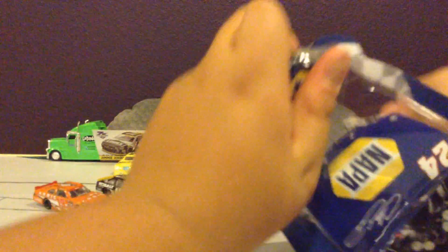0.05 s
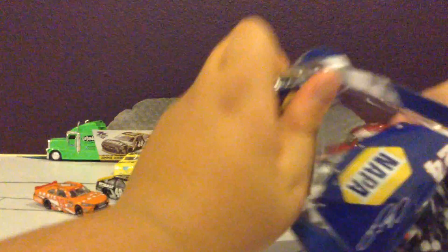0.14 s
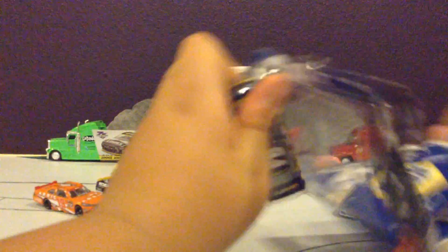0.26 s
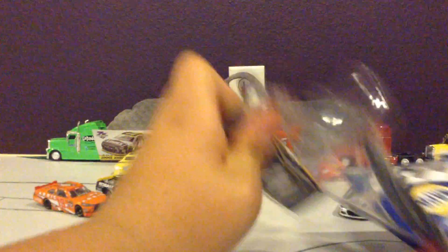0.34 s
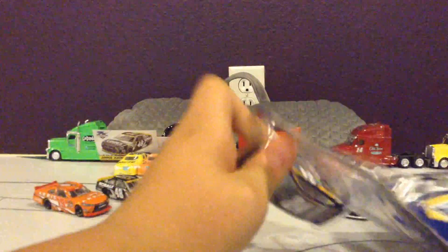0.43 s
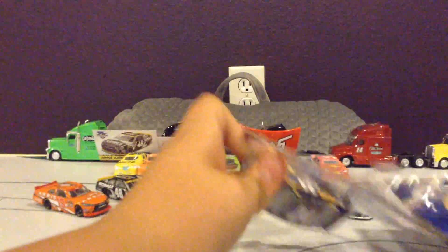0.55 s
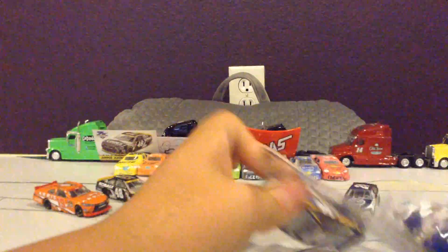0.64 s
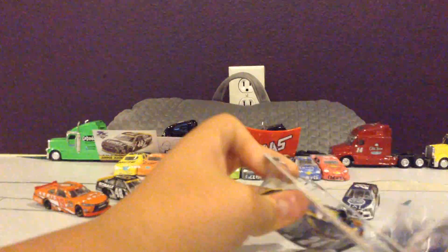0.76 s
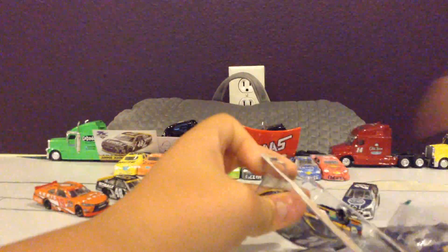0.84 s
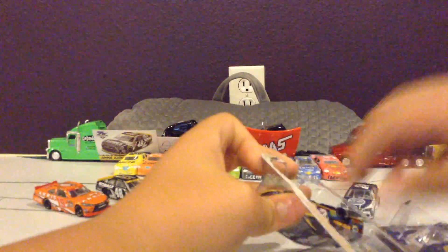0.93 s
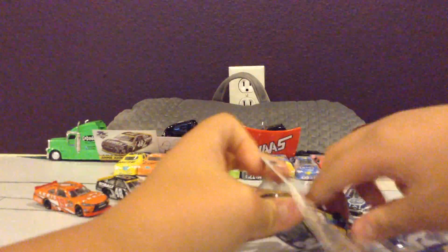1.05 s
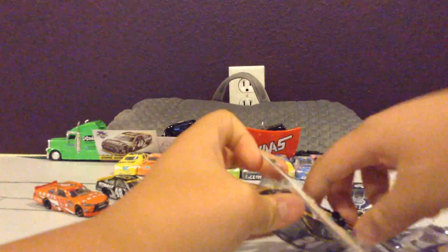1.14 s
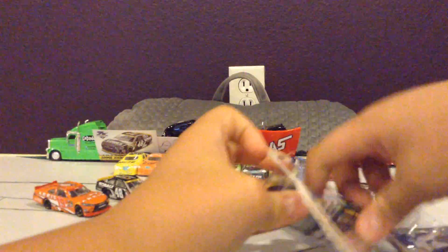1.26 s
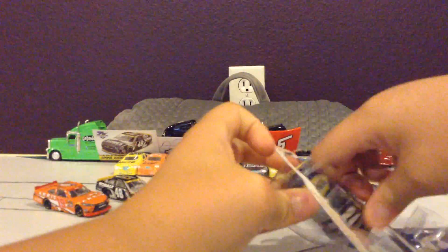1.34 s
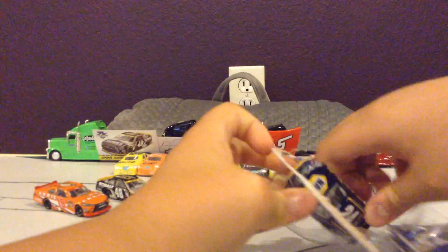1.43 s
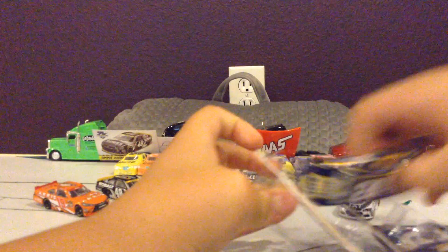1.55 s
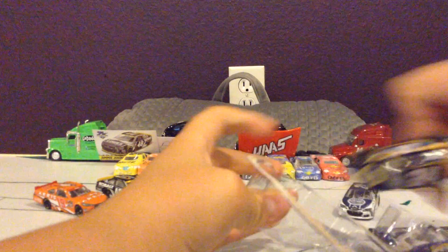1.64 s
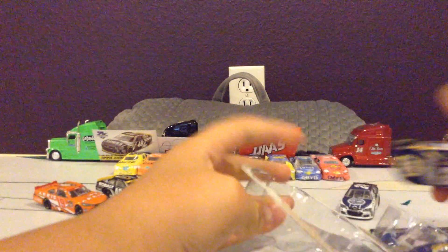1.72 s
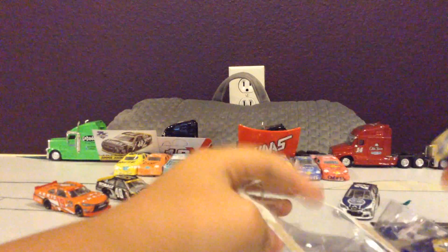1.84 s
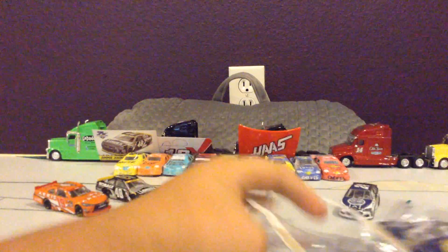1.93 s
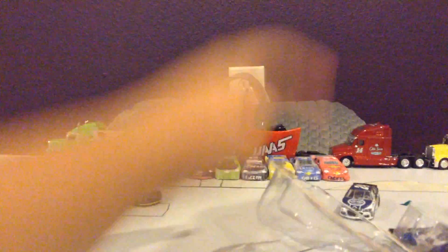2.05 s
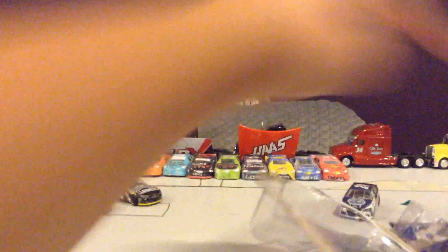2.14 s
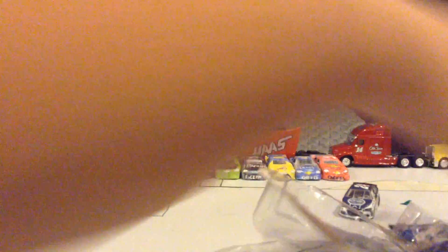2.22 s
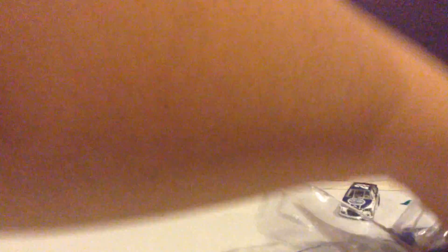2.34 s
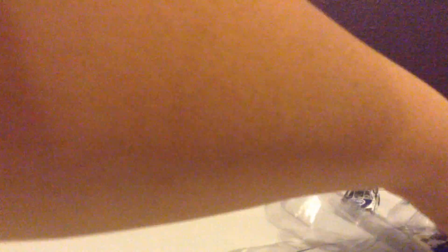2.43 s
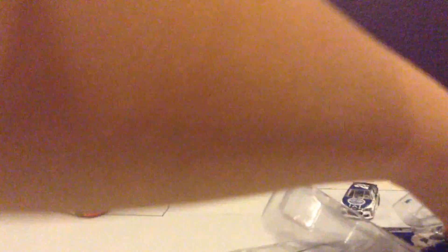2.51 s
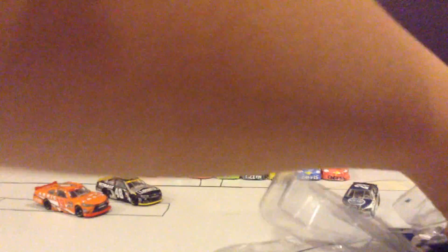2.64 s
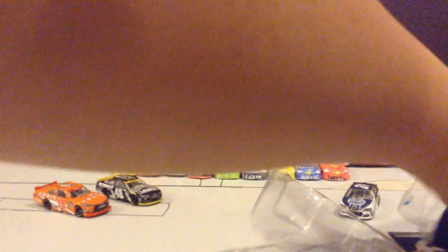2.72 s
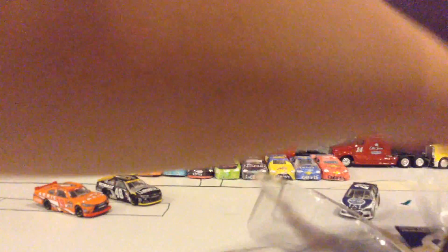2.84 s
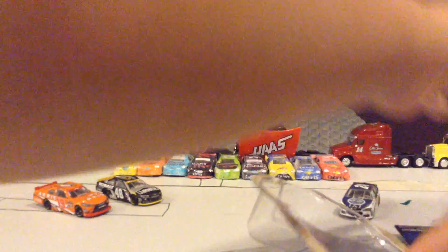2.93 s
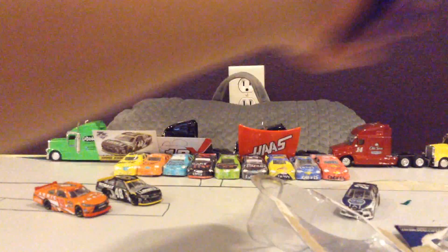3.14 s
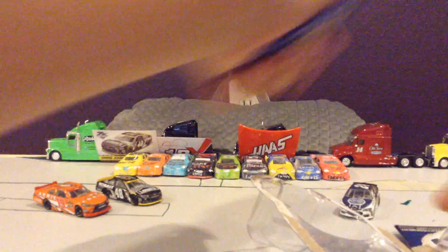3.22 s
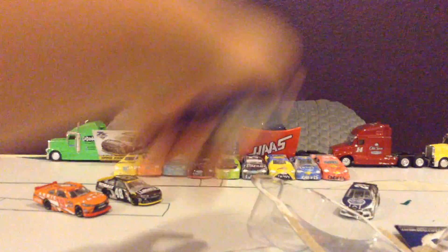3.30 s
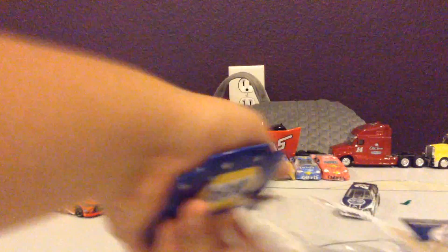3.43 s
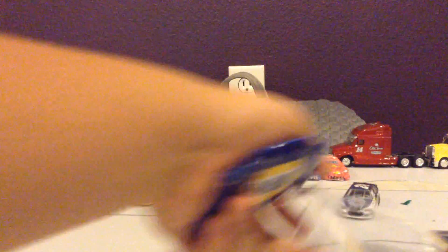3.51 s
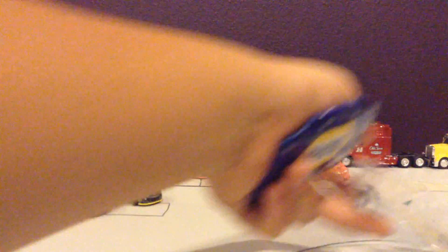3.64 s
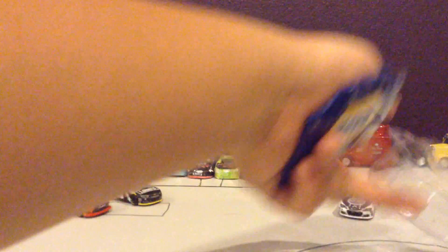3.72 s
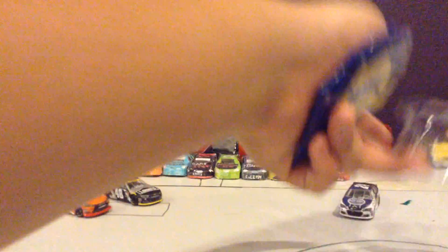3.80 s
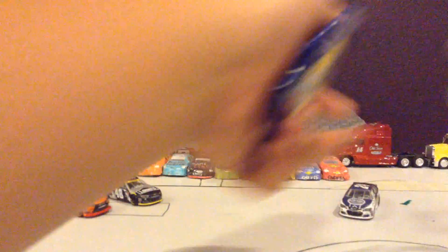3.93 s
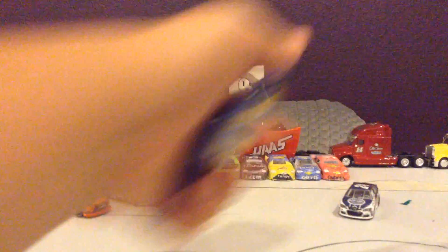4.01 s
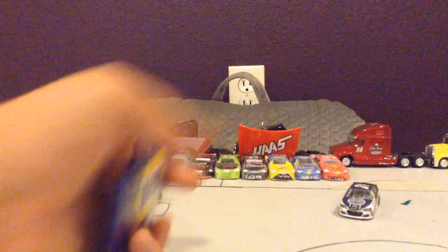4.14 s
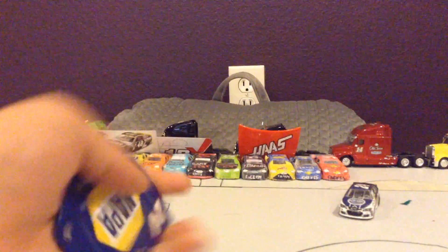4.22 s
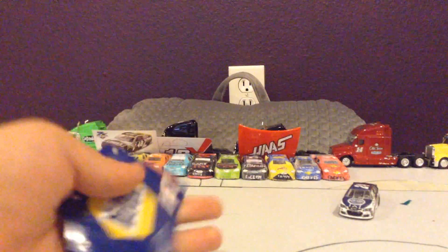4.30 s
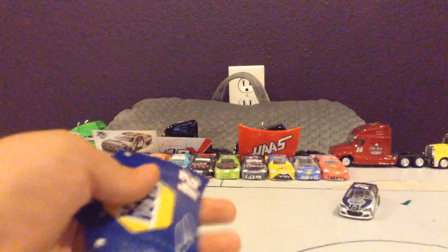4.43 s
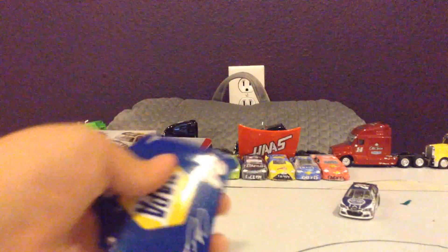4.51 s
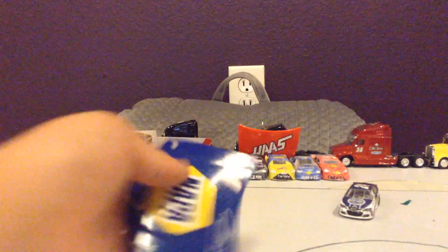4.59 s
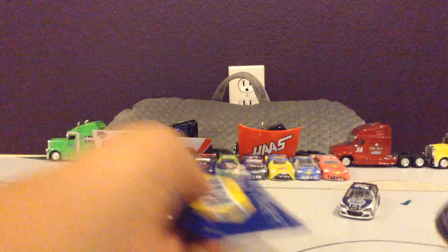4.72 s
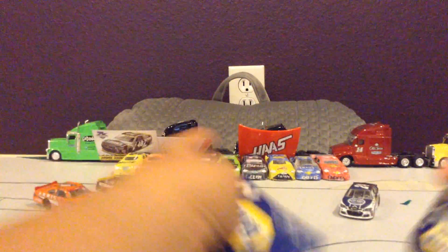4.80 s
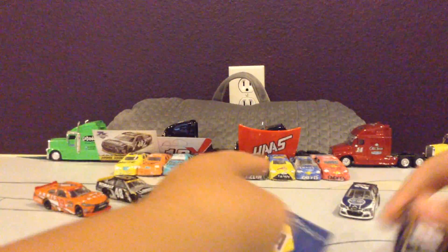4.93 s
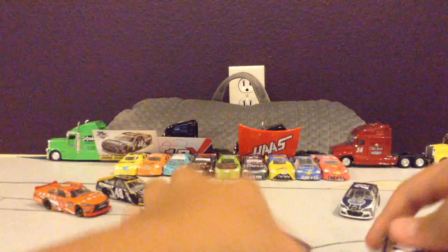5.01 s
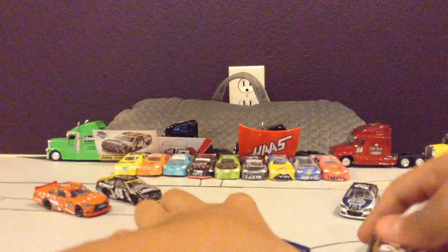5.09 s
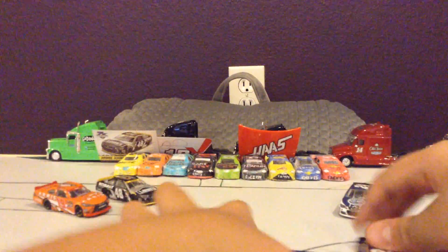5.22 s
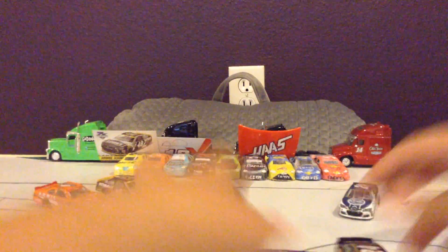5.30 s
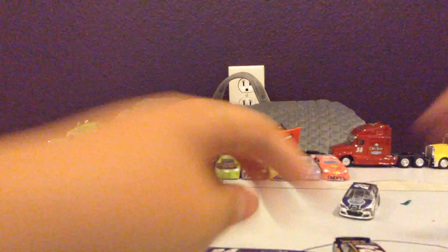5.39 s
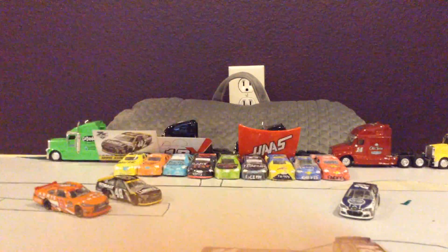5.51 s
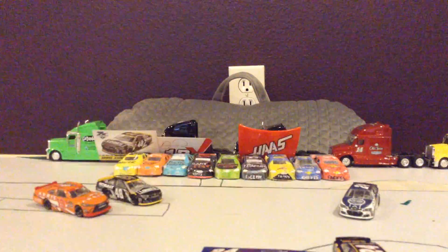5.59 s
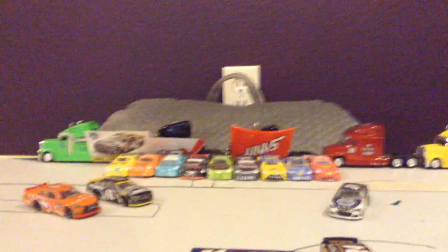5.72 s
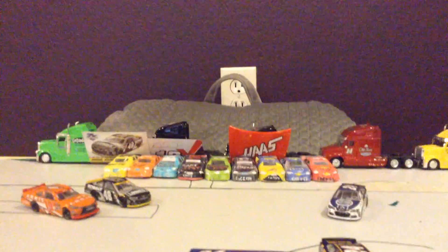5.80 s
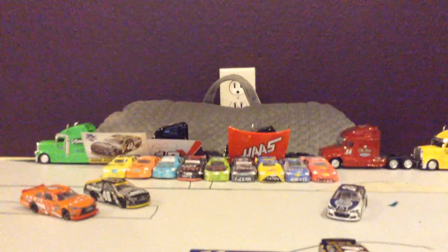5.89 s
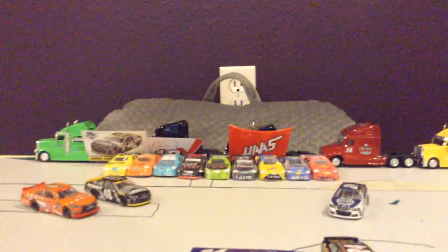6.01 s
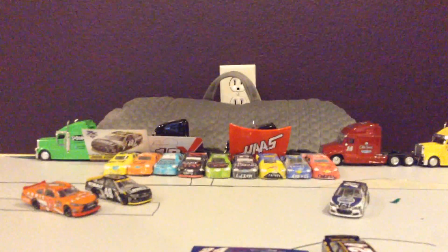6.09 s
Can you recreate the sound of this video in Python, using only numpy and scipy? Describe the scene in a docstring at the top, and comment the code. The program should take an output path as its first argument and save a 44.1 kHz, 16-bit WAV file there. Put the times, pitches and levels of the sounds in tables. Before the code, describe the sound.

Hands tear a stiff plastic shell off its cardboard backing close to a small microphone in a quiet room. A dense burst of crinkling and sharp loud snaps comes first, thinning to small clicks and soft rustles. Later the empty packaging is moved aside with fresh pops, scrapes and knocks on the table, ending nearly quiet with a very faint distant whirr.

```python
"""Blister pack pulled off its card

Hands pull a stiff plastic blister off its card, close to a small microphone in a quiet room.
The shell buckles with damped sine pops and noise cracks over a rustle of tiny pops and filtered slips;
thuds ring the table in low decaying sines, edges scrape in noise bursts, narrow bands linger.
Room tone and hum are filtered noise; late on, a faint distant whirr swells in narrow noise bands."""
import sys
import numpy as np
from scipy import signal
from scipy.io import wavfile
from scipy.ndimage import uniform_filter1d

SR = 44100
rng = np.random.default_rng(int(sys.argv[2]) if len(sys.argv) > 2 else 0)


def wav_out(sig):
    """Save sig, one row per channel (or a flat mono array), as 16-bit PCM at SR to the path in sys.argv[1]."""
    wavfile.write(sys.argv[1], SR, np.round(np.clip(np.atleast_2d(sig).T, -1, 1) * 32767).astype(np.int16))


N = 271215

# hand or pack meets the table: t/s, level/dB, f/Hz, t60/s
TABLE_HITS = [(0.048, -35, 133, 0.11), (0.2802, -17.5, 381, 0.076), (0.242, -18.5, 420, 0.049),
              (0.2856, -6.5, 640, 0.027), (0.472, -34, 416, 0.073), (0.86, -24, 500, 0.023),
              (2.41, -31, 255, 0.07), (2.529, -28.5, 307, 0.065), (2.757, -32, 430, 0.1),
              (3.444, -20, 230, 0.048), (3.468, -27.5, 339, 0.17), (3.725, -32, 206, 0.25),
              (3.743, -31, 228, 0.11), (3.795, -36.5, 376, 0.1), (4.308, -18.5, 409, 0.055),
              (4.639, -26.5, 397, 0.013), (4.9, -30.5, 212, 0.16), (5.033, -10.5, 373, 0.021),
              (5.184, -15, 230, 0.029), (5.224, -26, 308, 0.13), (5.256, -20.5, 251, 0.057),
              (5.754, -31.5, 180, 0.027)]


def amp(db):
    """Amplitude ratio of a level in dB."""
    return 10 ** (np.asarray(db) / 20)


def evened(x):
    """Scale to unit rms."""
    return x / np.sqrt(np.mean(x ** 2) + 1e-20)


def read(points, hz):
    """Interpolate a (f/Hz, value) curve along log frequency."""
    f, value = np.transpose(points)
    return np.interp(np.log(hz + 1), np.log(f + 1), value)


def add(mix, s, sound):
    """Add a sound into the mix at s seconds, cut at the end."""
    part = mix[round(s * SR):][:len(sound)]
    part += sound[:len(part)]


def colour(x, points):
    """Causal filter with the given spectrum: phase from the log gain."""
    hz = abs(np.fft.fftfreq(4096, 1 / SR))
    log_gain = np.log(amp(read(points, hz)))
    taps = np.fft.ifft(np.exp(np.conj(signal.hilbert(log_gain)))).real[:2048]
    taps = taps[None] if x.ndim > 1 else taps / np.linalg.norm(taps)
    return signal.oaconvolve(x, taps, axes=-1)[..., :x.shape[-1]]


def band(x, hz, width_hz):
    """One two-pole resonance, output at unit rms."""
    pole = np.exp(-np.pi * width_hz / SR)
    poles = [1, -2 * pole * np.cos(2 * np.pi * hz / SR), pole ** 2]
    return evened(signal.lfilter([1, 0, -1], poles, x))


def twice_banded(x, hz, width_hz):
    """The same resonance applied twice, for steeper skirts."""
    return band(band(x, hz, width_hz), hz, width_hz)


def patchy(x, patchy_db):
    """Level drifts at random in patches of time and pitch."""
    z = signal.stft(x, nperseg=512, noverlap=384)[2]
    field = uniform_filter1d(rng.standard_normal(z.shape), size=9, axis=0)  # over pitch
    field = uniform_filter1d(field, size=14, axis=1)  # over time
    return signal.istft(z * amp(patchy_db * evened(field)), nperseg=512, noverlap=384)[1][:N]


def air():
    """Steady room tone with microphone hiss, and the unsteady hum of the house in two noise bands."""
    # quiet room spectrum: f/Hz, gain/dB
    tone_spectrum = [(40, -37), (110, -11), (200, 3.5), (330, -3), (600, -24.5), (1500, -33), (3000, -22.5),
                     (6000, -22), (15000, -30)]
    # hum: f/Hz, width per pass/Hz, rms/dB
    hum_bands = [(117.4, 14, -70.5), (223.3, 55, -60.5)]
    tone_db = -57
    tone = evened(patchy(colour(rng.standard_normal(N), tone_spectrum), patchy_db=4.5))
    noise = rng.standard_normal(N)
    hum = sum(amp(db) * twice_banded(noise, hz, width_hz) for hz, width_hz, db in hum_bands)
    return amp(tone_db) * tone + hum


def effort(column):
    """Level over time of all moves together in power, each swelling and fading evenly in dB."""
    # each grip, pull or slide of the hands: peak t/s, swell/s, fade/s,
    # shell crinkle/dB, card crinkle/dB, hiss of sliding skin/dB
    moves = [(0.01, 0.18, 0.19, -37, -30.5, -31.5), (0.241, 0.065, 0.11, -30, -27.5, -24),
             (.34, 0.12, 0.17, -27.5, -27.5, -28.5), (.48, 0.056, 0.25, -32, -43, -44),
             (.7, 0.48, 0.7, -51, -50.5, -55), (.82, 0.1, .03, -57, -53, -52),
             (.86, .02, 0.22, -47, -50, -50), (0.931, 0.086, 0.058, -39, -40.5, -53),
             (1.09, 0.054, 0.073, -43.5, -50.5, -51), (1.2, 0.36, 0.33, -56, -53, -57),
             (1.34, 0.14, 0.23, -45.5, -49.5, -47), (1.568, 0.068, 0.069, -48.5, -47.5, -58),
             (1.89, 0.21, 0.22, -56, -56.5, -59), (2.14, 0.28, 0.048, -52.5, -50.5, -50.5),
             (2.23, 0.076, 0.14, -54.5, -54, -58.5), (2.41, 0.015, 0.09, -43, -41, -43),
             (2.52, 0.056, 0.081, -42, -46, -44), (2.64, 0.16, 0.12, -52.5, -50.5, -52),
             (2.77, 0.056, 0.14, -43, -44.5, -54), (2.85, 0.11, 0.037, -46, -48, -60),
             (2.93, 0.024, 0.36, -47, -47.5, -69), (3.14, 0.069, 0.079, -49, -51, -48),
             (3.428, 0.0085, 0.049, -36, -35.5, -50), (3.459, 0.023, 0.38, -47, -41, -47),
             (3.67, 0.15, 0.18, -38, -37, -42.5), (3.8, 0.09, 0.42, -72, -49, -58),
             (3.96, 0.066, 0.085, -51.5, -48, -72), (4.06, 0.044, 0.34, -44.5, -41.5, -48.5),
             (4.24, 0.3, 0.096, -50, -45.5, -38.5), (4.32, 0.088, 0.1, -42, -31.5, -58),
             (4.619, 0.018, 0.12, -62, -64, -40), (4.88, 0.072, 0.045, -58, -47.5, -52),
             (4.91, 0.033, 0.13, -48, -39.5, -52), (5.05, 0.019, 0.14, -38.5, -38, -42.5),
             (5.25, 0.093, 0.14, -38.5, -39.5, -37), (5.39, 0.15, 0.063, -46.5, -53, -44.5),
             (5.59, 0.11, 0.12, -62, -65, -62), (5.77, 0.15, 0.13, -55.5, -52, -49),
             (6.0, 0.94, 0.43, -64, -68, -62.5)]
    change_db = 20  # gained over the swell, lost over the fade
    t = np.arange(0, N + 64, 64) / SR
    power = np.zeros(len(t))
    for move in moves:
        peak_s, swell_s, fade_s = move[:3]
        away = np.where(t < peak_s, (peak_s - t) / swell_s, (t - peak_s) / fade_s)
        power += amp(2 * (move[column] - change_db * away))
    return np.interp(np.arange(N) / SR, t, np.sqrt(power))


def slip_sizes(per_s, spread_db):
    """Sparse impulses at random times, of uneven size."""
    size = amp(spread_db * np.minimum(rng.exponential(1, N), 5))
    return size * (rng.random(N) < per_s / SR)


def over_smooth(slips, smooth):
    """Mix unit-rms slips with a power share of smooth noise."""
    return np.sqrt(1 - smooth) * evened(slips) + np.sqrt(smooth) * rng.standard_normal(N)


def creases(per_s, spread_db, smooth, cycles):
    """Many tiny pops, each crease at one of 16 pitches, over a share of smooth noise."""
    size = slip_sizes(per_s, spread_db)
    pitches_hz = np.geomspace(450, 7000, num=16)
    which = rng.integers(0, len(pitches_hz), N)
    t, pops = np.arange(600) / SR, np.zeros(N)
    for k, hz in enumerate(pitches_hz):
        pop = np.sin(2 * np.pi * hz * t) * t * np.exp(-t * hz / cycles)
        pop *= np.sqrt(hz) / np.linalg.norm(pop)
        pops += signal.oaconvolve(size * (which == k), pop)[:N]
    return over_smooth(pops, smooth)


def grains(per_s, spread_db, smooth, length_s):
    """Short noisy slips of uneven size over a share of smooth noise."""
    t = np.arange(1000) / SR
    envelope = signal.oaconvolve(slip_sizes(per_s, spread_db), t * np.exp(-t / length_s))[:N]
    return over_smooth(envelope * rng.standard_normal(N), smooth)


def table_rumble_level(card_level):
    """Card crinkle through the table, a resting floor and shaking after thuds, summed in power."""
    through_db, rest_db = -7, -60  # re the card's crinkle; with the hands at rest
    lowered_s, held_db = 0.92, -3  # until then the pack is held up and less reaches the table
    shake_db, shake_t60_s = -18.5, 0.26  # after a thud, re its listed level
    t = np.arange(N) / SR
    shaking = np.zeros(N)
    for s, db, *_ in TABLE_HITS:
        decay_db = -60 * np.maximum(t - s, 0) / shake_t60_s
        shaking += (t > s) * amp(2 * (db + shake_db + decay_db))
    through = amp(through_db + held_db * (t < lowered_s)) * card_level
    return np.sqrt(through ** 2 + amp(2 * rest_db) + shaking)


def handling():
    """Slips excite card and shell, sliding skin hisses, the table carries a rumble."""
    # spectra: f/Hz, gain/dB
    card_spectrum = [(300, -18.5), (500, -3), (1100, 1.5), (1700, -5.5), (3000, -9), (8000, -42)]
    shell_spectrum = [(900, -19), (1800, 4), (2600, 6.5), (3800, 0.5), (6000, -5.5), (12000, -6.5)]
    hiss_spectrum = [(1500, -45), (3500, -8.5), (5500, -3), (9000, -4), (15000, -6)]
    rumble_spectrum = [(60, -31.5), (150, -8), (250, 3), (420, 1.5), (800, -33.5)]
    shell_level, card_level, hiss_level = effort(column=3), effort(column=4), effort(column=5)
    slips = creases(per_s=2300, spread_db=2.7, smooth=0.45, cycles=1.3)
    card = patchy(colour(slips, card_spectrum), patchy_db=1.8)
    other_slips = np.roll(slips, SR)  # shifted 1 s: shell grains differ from the card's
    shell = patchy(colour(other_slips, shell_spectrum), patchy_db=1.6)
    hiss = colour(grains(per_s=390, spread_db=1.5, smooth=0.58, length_s=0.001), hiss_spectrum)
    rumble = colour(grains(per_s=99, spread_db=2.0, smooth=0.57, length_s=0.0032), rumble_spectrum)
    crinkle = shell_level * evened(shell) + card_level * evened(card)
    return crinkle + hiss_level * evened(hiss) + table_rumble_level(card_level) * evened(rumble)


def thuds():
    """A soft push rings the table top: two decaying low sines with a rounded onset."""
    out, t = np.zeros(N), np.arange(9000) / SR
    for s, db, hz, t60_s in TABLE_HITS:
        wave = np.sin(2 * np.pi * hz * t) + 0.26 * np.sin(2 * np.pi * 1.7 * hz * t)
        onset = 1 - np.exp(-t / 0.00048)
        add(out, s, amp(db - 1.0 - 60 * t / t60_s) * onset * wave)
    return out


def snaps():
    """Buckling folds: a damped pop, mid and treble cracks, the shell shivering at the pop's pitch."""
    # t/s, pop peak/dB, pop f/Hz, treble crack/dB re pop, mid crack/dB re pop (cracks trimmed below)
    folds = [(0.083, -21, 1610, -15, -11), (0.102, -21.5, 1580, -24, -15.5), (0.117, -19, 1360, -3, -15),
             (0.176, -27, 1100, -6.5, -6), (0.202, -27, 1240, -10, -8), (0.254, -15, 2950, -4, -10),
             (0.2863, -1.5, 1630, -9, -12), (0.335, -13, 2400, 3, -8.5), (0.378, -18.5, 2400, -1.5, -12),
             (0.463, -21, 1200, -12, -7), (0.471, -5, 1100, -16, -4), (0.482, -12, 1930, -8.5, -4.5),
             (0.512, -28, 2500, -11, 5), (0.577, -28.5, 1090, -6.5, -3), (0.598, -29.5, 1010, -8, -1),
             (0.637, -25, 4540, -3.5, 0), (0.717, -32, 1006, -12, -1), (0.742, -30, 1670, -5.5, 0),
             (0.798, -33, 3390, -8, -3), (0.811, -32, 3920, -9, -10), (0.839, -36, 2200, -18, -2),
             (0.85, -18, 1280, -15, 0), (0.855, -16.5, 2500, -8, 0), (0.863, -19.5, 2410, -8.5, 0.5),
             (0.868, -17, 1290, -14, -4), (0.909, -27, 1830, -17, -2), (0.927, -35, 3300, -11, -6),
             (0.951, -31, 1230, -9, 6), (1.062, -29.5, 1200, -22, -19), (1.088, -35, 1600, -8, -6),
             (1.092, -22.5, 1500, -15, -3), (1.109, -32, 2310, -14, -3), (1.179, -23, 1560, -37, -21.5),
             (1.215, -28.5, 1580, -32, -25), (1.235, -32, 1390, -27, -12), (1.308, -26, 1480, -24, -25),
             (1.328, -30, 1410, -22, -17), (1.345, -33.5, 4260, 2.5, -3), (1.406, -20, 1330, -42, -25),
             (1.417, -18, 1920, -34, -16), (1.428, -23, 1030, -4, -9), (1.499, -35, 5900, -20, -13),
             (1.45, -32, 1510, -18, -6), (1.537, -43, 4400, 0, 2), (1.783, -16.5, 1255, -57, -19),
             (1.733, -46, 2980, -15, -9), (1.903, -39, 1300, -7, -12), (1.865, -35, 2960, -14, -13),
             (1.882, -33, 3180, -1.5, -27), (1.949, -35.5, 1030, -18, -17), (2.022, -44, 1310, 0, 7),
             (2.065, -49, 3480, -23, -15), (2.078, -33, 1800, -27, -3), (2.089, -38, 3470, -12, -6),
              (2.138, -34, 2480, -12, -6), (2.181, -43, 4430, -8, -25), (2.202, -41, 4800, -5, -20),
             (2.209, -42, 1170, -7, -1), (2.239, -43, 2410, -15, -10), (2.286, -38, 2940, -9, -22),
             (2.304, -41, 3310, -7, -18), (2.352, -49, 2920, -8, -15), (2.401, -26, 2590, -6.5, -3),
             (2.435, -17, 2400, -5.5, -10), (2.502, -31, 1940, 0.5, -1), (2.521, -28, 2760, -1, -13),
             (2.531, -21, 1040, -12, -19), (2.625, -32, 1550, -7, -23), (2.672, -45.5, 690, 4.5, -7),
             (2.759, -18, 1080, -37, -12), (2.776, -16.5, 2800, -45, -3), (2.912, -19.5, 2080, -15, -1),
             (2.92, -25.5, 1010, -16, -25), (2.968, -19.5, 1700, -23, -4), (3.044, -29.5, 1090, -7.5, -7),
             (3.091, -37.5, 1680, -9, 3), (3.143, -15.5, 4160, -7, -13), (3.161, -34, 4500, -2, -12),
             (3.174, -30.5, 4300, 4, -4), (3.418, -20.5, 1240, -3, -26), (3.427, -24, 1260, -1.5, -13),
             (3.452, -21.5, 2500, -12, -13), (3.463, -17.5, 880, -17, -24), (3.496, -24, 1900, -29.5, -19),
             (3.574, -23, 740, -20, 2), (3.612, -30.5, 630, -4.5, -15), (3.632, -23.5, 600, -25, -17),
             (3.648, -35, 790, -20, -11), (3.685, -35, 2700, -21, -6), (3.702, -30, 2300, -15, -8),
             (3.794, -32.5, 1030, -30, -7), (3.939, -30.5, 870, -19, -2), (4.036, -31, 3150, -12, -15),
             (4.066, -25.5, 1570, -6.5, -3), (4.171, -24, 810, -5, -29.5), (4.272, -22, 2130, -16, -14),
             (4.291, -26.5, 900, -15, 2), (4.309, -3.5, 1160, -40, -24), (4.333, -15.5, 1090, -44, -20),
             (4.345, -24, 1030, -39, -27), (4.426, -16.5, 1010, -21, -11), (4.492, -35, 6700, -1, -6),
             (4.541, -34, 4500, -7, -17), (4.605, -23.5, 7250, -2, -40), (4.615, -23, 4500, -6, -16),
             (4.619, -29, 3330, 1.5, -26), (4.737, -34, 4500, -10.5, -29), (4.803, -32.5, 5070, 0, -16),
             (4.851, -41, 1270, 8, -15), (4.902, -17, 940, -37, -6), (4.916, -21, 877, -32, -25),
             (5.002, -20, 1300, -28, -16), (5.032, -5.5, 980, -17.5, -11), (5.049, -9.5, 820, -20, -16),
             (5.173, -23.5, 3280, -4, -20), (5.183, -24, 3300, -4, -22), (5.191, -16.5, 3560, -17, -26),
             (5.2044, -4.5, 6400, -4.5, -16), (5.223, -26, 5500, -7, -12), (5.2475, -16.5, 2500, -5.5, -20),
             (5.257, -25, 2530, -2, -22), (5.263, -25, 1090, -3, -6), (5.311, -28, 3630, -5, -12),
             (5.38, -41, 1800, -9, -10), (5.47, -45.5, 3260, -17, -9), (5.77, -34.5, 870, 0, -1)]
    # spectra: f/Hz, gain/dB
    treble_spectrum = [(1500, -16.5), (4000, -0.5), (6000, -2), (9000, -3.5), (15000, -7)]
    mid_spectrum = [(500, -16), (1400, -0.5), (2300, -0.5), (4000, -7), (9000, -28)]
    # decay time set by level: quieter folds are given longer tails
    full_scale_t60_s, shorter_s_per_db = 0.022, 0.0011
    rise_s = 0.00097
    out, t = np.zeros(N), np.arange(3500) / SR
    late = np.maximum(t - rise_s, 0)  # the pop comes when the fold gives way
    noise = rng.standard_normal((len(folds), 3, len(t)))
    trebles, mids = colour(noise[:, 0], treble_spectrum), colour(noise[:, 1], mid_spectrum)
    top_edge = signal.butter(2, 20000, fs=SR, output="sos")
    for fold, treble, mid, low in zip(folds, trebles, mids, noise[:, 2]):
        s, db, hz, treble_db, mid_db = fold
        turns = hz * late
        cycles = -np.sin(2 * np.pi * turns) + 0.25 * np.sin(2 * np.pi * 1.94 * turns)
        pop = cycles * late * np.exp(-late * (hz * 1.15 + 450))  # pulls in first
        shiver = (1 - np.exp(-turns / 1.8)) * band(low, 0.88 * hz, 0.23 * hz)
        t60_s = full_scale_t60_s - shorter_s_per_db * db
        ring = np.minimum(t / rise_s, 1) ** 2 * amp(-60 * late / t60_s)
        treble = evened(signal.sosfilt(top_edge, treble)) * np.exp(-late / 0.0031)
        mid = evened(mid) * (0.57 + 0.53 * np.exp(-late / 0.00089))
        crack = amp(treble_db - 0.5) * treble + amp(mid_db - 3.0) * mid
        add(out, s, amp(db) * (pop / abs(pop).max() + ring * (amp(-9) * shiver + crack)))
    return out


def scrapes():
    """An edge drags and lets go: wide noise bursts that swell and stop short."""
    # peak t/s, rms before shaping/dB, centre f/Hz, swell/s
    drags = [(0.255, -23, 6950, 0.017), (0.321, -30, 8000, 0.0043), (0.87, -33.5, 2780, 0.011),
             (1.095, -42.5, 6000, 0.013), (2.506, -34, 6000, 0.0044), (3.042, -43, 8000, 0.0038),
             (3.134, -22.5, 6100, 0.0046), (4.299, -38, 6970, 0.028), (4.418, -43, 9000, 0.0044),
             (4.484, -48.5, 9000, 0.006), (4.609, -24.5, 11000, .004), (4.946, -46, 9000, 0.0066),
             (5.312, -39.5, 7000, 0.014)]
    out, t = np.zeros(N), np.arange(-4000, 9000) / SR
    for s, db, hz, swell_s in drags:
        shape = np.where(t < 0, np.exp(-(t / swell_s) ** 2), np.exp(-t / (0.2 * swell_s)))
        add(out, s + t[0], amp(db) * shape * band(rng.standard_normal(len(t)), hz, 1.4 * hz))
    return out


def overload_thumps():
    """A short negative pulse under the loudest snaps, as the microphone overloads."""
    # t/s, peak/dB
    overloads = [(0.2863, -14.5), (5.206, -24)]
    out, t = np.zeros(N), np.arange(-300, 300) / SR
    for s, db in overloads:
        add(out, s + t[0], -amp(db) * np.exp(-(t / 0.00025) ** 2))
    return out


def rings():
    """Narrow noise bands linger after some snaps, decaying exponentially."""
    # t/s, rms before shaping/dB, f/Hz, width per pass/Hz, t60/s
    lingering = [(0.29, -20, 1180, 500, 0.057), (.34, -33, 5220, 500, 0.65), (1.347, -40, 4200, 600, 0.13),
                 (1.539, -48.5, 4300, 400, .12), (3.64, -46, 2730, 300, .2), (3.85, -51, 4500, 800, 1),
                 (3.941, -42, 900, 300, 0.21), (4.312, -19, 794, 450, 0.15), (4.313, -22, 1870, 600, 0.11),
                 (4.336, -29, 1890, 700, 0.22), (4.621, -47, 3400, 300, 0.34), (5.05, -27, 1080, 900, 0.15),
                 (5.247, -16.5, 2480, 350, 0.034), (5.274, -37, 2460, 350, 0.15),
                 (5.345, -44, 4100, 298, .15)]
    out, t = np.zeros(N), np.arange(-4000, 9000) / SR
    for s, db, hz, width_hz, t60_s in lingering:
        onset = np.clip(t / 0.0013, 0, 1)
        ending = np.clip((t[-1] - t) / 0.05, 0, 1)
        shape = onset * amp(-60 * np.maximum(t, 0) / t60_s) * ending
        add(out, s + t[0], amp(db) * shape * twice_banded(rng.standard_normal(len(t)), hz, width_hz))
    return out


def whirr():
    """A faint distant whirr swells: one noise through narrow bands, each applied twice."""
    # t/s, level/dB
    swell = [(5.25, -80), (5.4, -57), (5.75, -70), (5.95, -63), (5.97, -56), (6.15, -60)]
    # f/Hz, width per pass/Hz, level/dB
    whirr_bands = [(1030, 200, -8), (2270, 240, -4.5), (4500, 320, -14)]
    s, level_db = np.transpose(swell)
    noise = rng.standard_normal(N)
    bands = sum(amp(db) * twice_banded(noise, hz, width_hz) for hz, width_hz, db in whirr_bands)
    return amp(np.interp(np.arange(N) / SR, s, level_db)) * bands


def room(x):
    """Dense reflections after the first few milliseconds, each band dying at its own speed."""
    # f/Hz, t60/s
    decay = [(200, 1), (1000, 0.31), (4000, 0.38), (12000, 0.33)]
    taps = rng.standard_normal(SR // 2) * (np.arange(SR // 2) > 150)
    hz, t, z = signal.stft(taps, SR, nperseg=256)
    fading = amp(-60 * t / read(decay, hz)[:, None])
    tail = signal.istft(z * fading, SR, nperseg=256)[1]
    return signal.fftconvolve(x, tail / np.linalg.norm(tail))[:N]


def scene():
    """Hits with their reflections, over handling, overload thumps, air and whirr."""
    hits = thuds() + snaps() + scrapes() + rings()
    no_bass = signal.butter(3, 120, "high", fs=SR, output="sos")  # small things radiate no deep bass
    hits = signal.sosfilt(no_bass, hits)
    echoed = hits + amp(-14.5) * room(hits)
    return (air() + handling() + echoed + overload_thumps() + whirr())[None]


def record(dry):
    """The microphone drops deep bass, the loudest pops clip softly, the top rolls off to a band limit."""
    ceiling, shoulder_hz, edge_hz = 0.72, 15450, 16521
    thin = signal.sosfilt(signal.butter(1, 90, "high", fs=SR, output="sos"), dry)
    held = ceiling * thin / (ceiling ** 8 + thin ** 8) ** (1 / 8)
    shoulder = signal.firwin(127, shoulder_hz, fs=SR)
    edge = signal.firwin(511, edge_hz, window=("kaiser", 9), fs=SR)
    top = signal.oaconvolve(held, shoulder[None], "same")
    return signal.oaconvolve(top, edge[None], "same")


dry = scene()
out = record(dry)
wav_out(out)
```